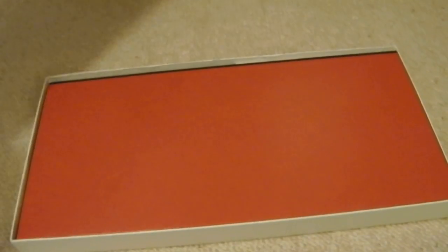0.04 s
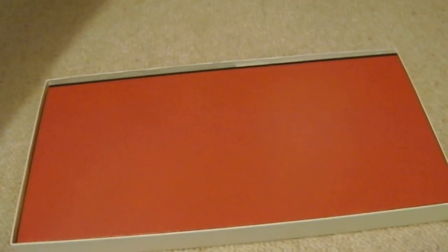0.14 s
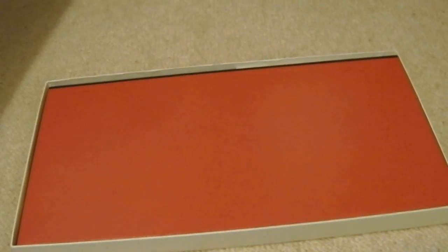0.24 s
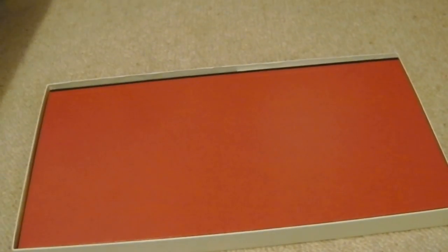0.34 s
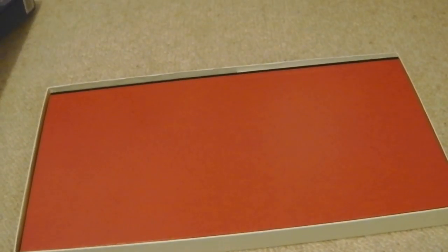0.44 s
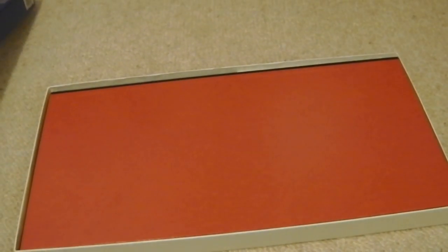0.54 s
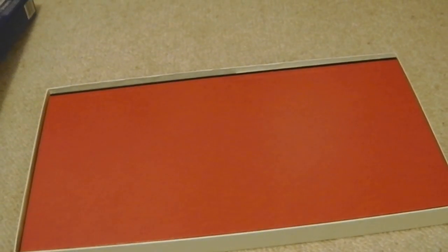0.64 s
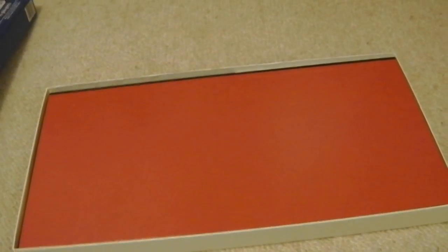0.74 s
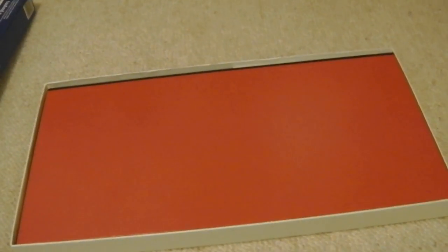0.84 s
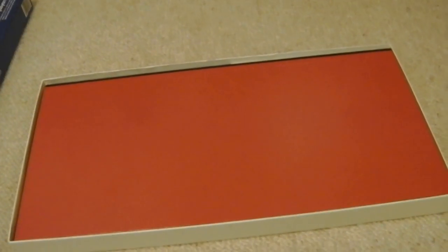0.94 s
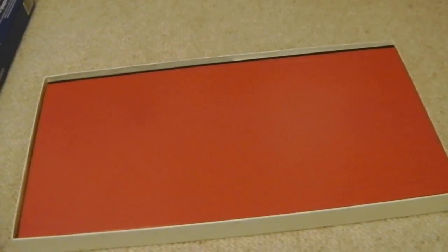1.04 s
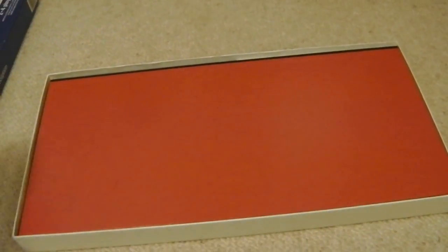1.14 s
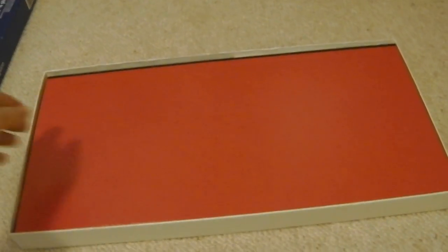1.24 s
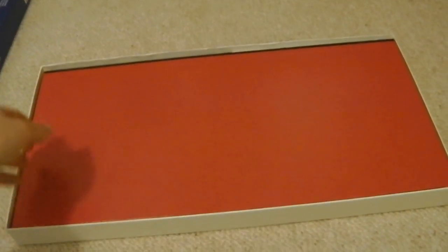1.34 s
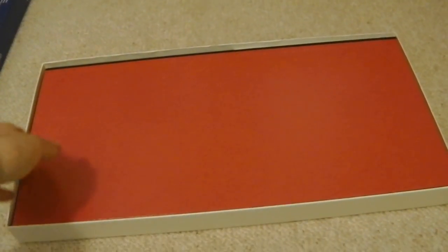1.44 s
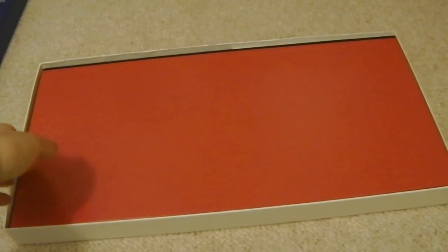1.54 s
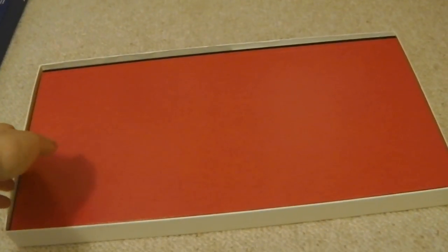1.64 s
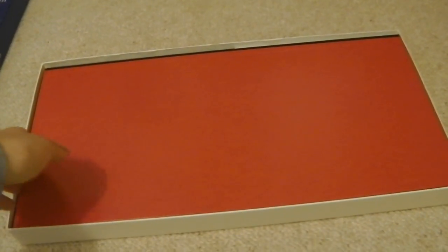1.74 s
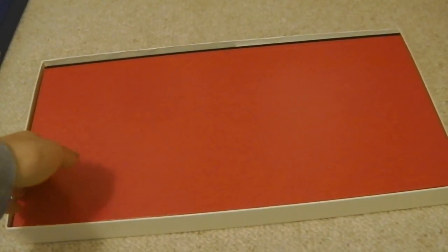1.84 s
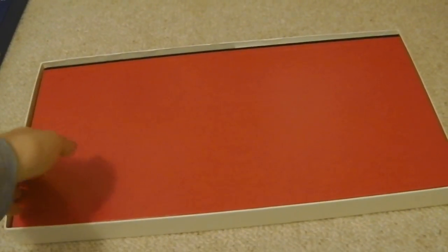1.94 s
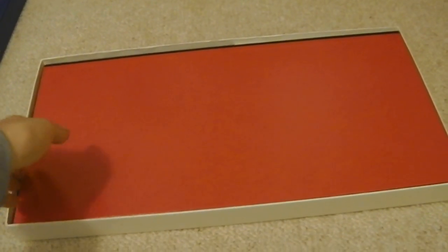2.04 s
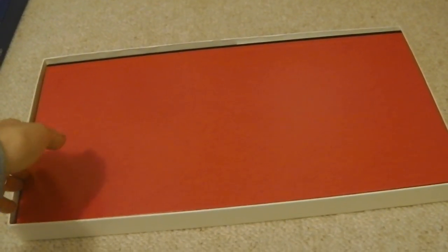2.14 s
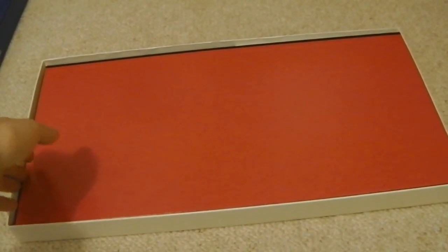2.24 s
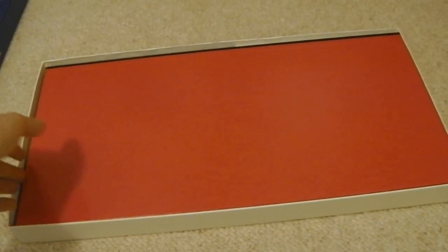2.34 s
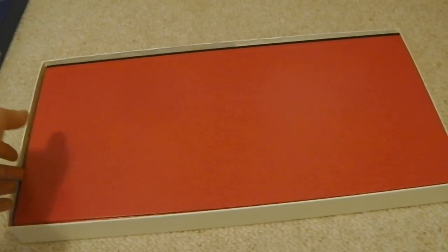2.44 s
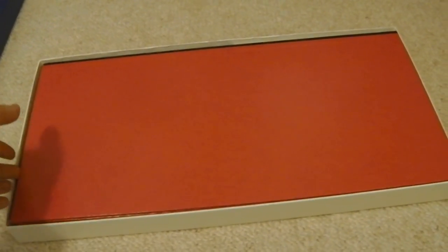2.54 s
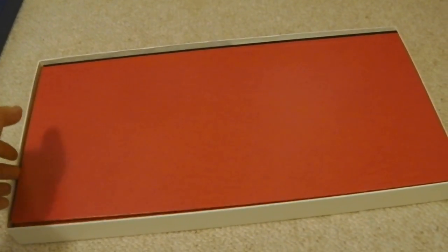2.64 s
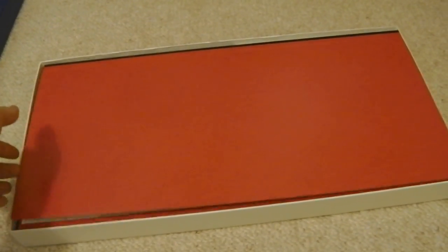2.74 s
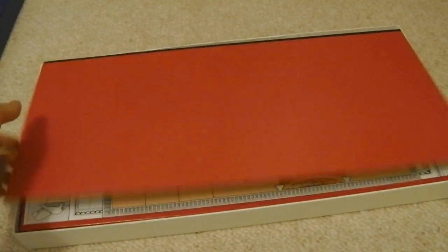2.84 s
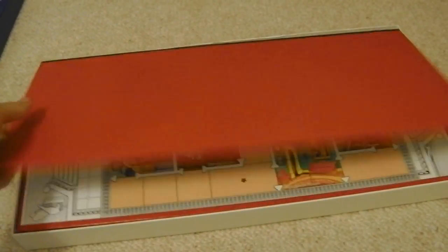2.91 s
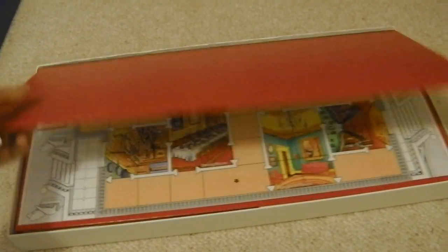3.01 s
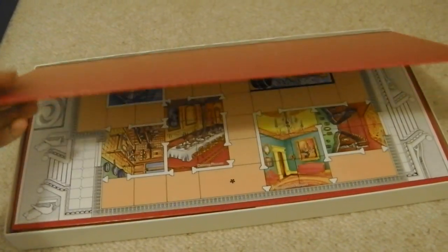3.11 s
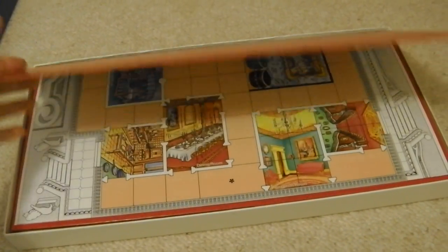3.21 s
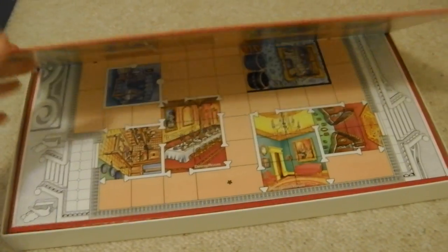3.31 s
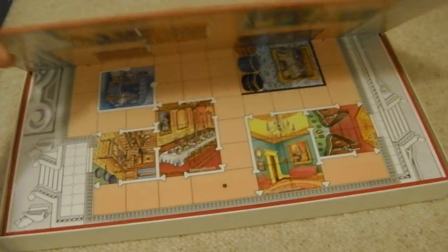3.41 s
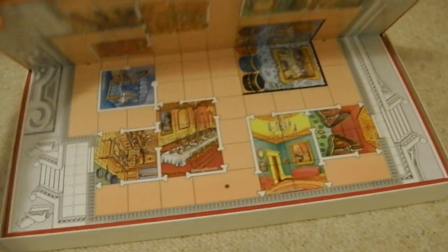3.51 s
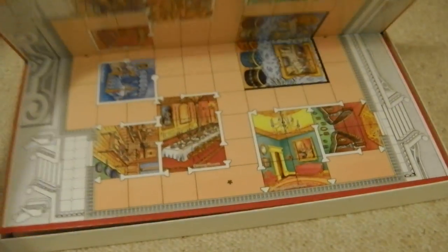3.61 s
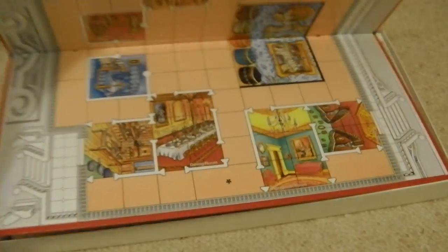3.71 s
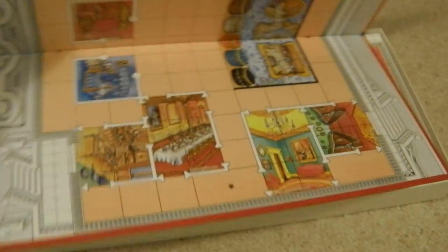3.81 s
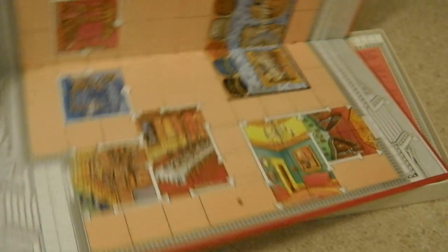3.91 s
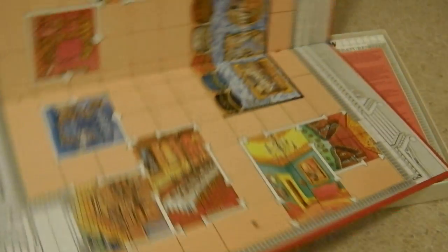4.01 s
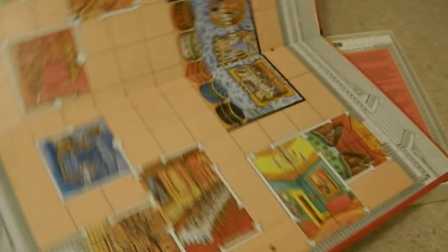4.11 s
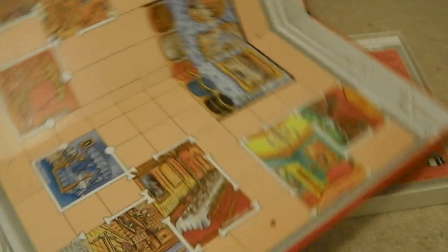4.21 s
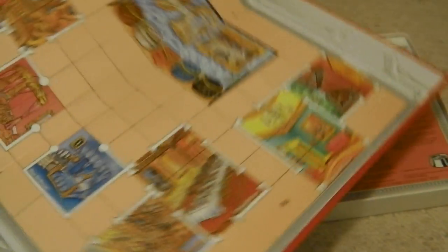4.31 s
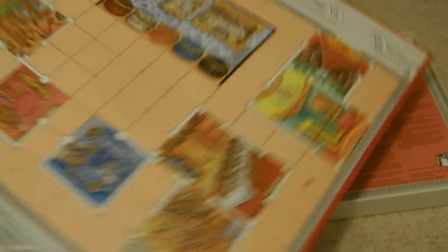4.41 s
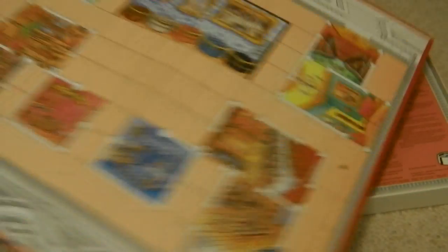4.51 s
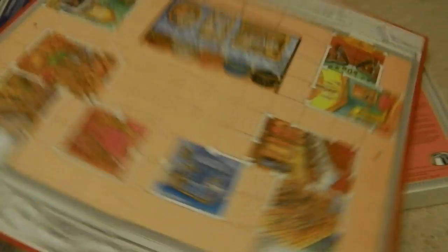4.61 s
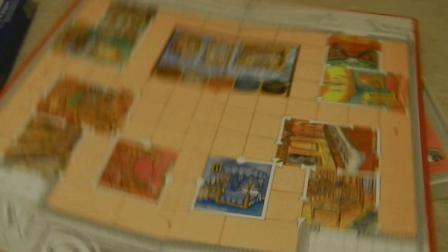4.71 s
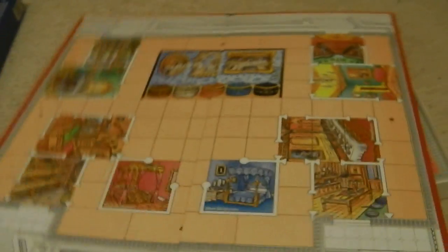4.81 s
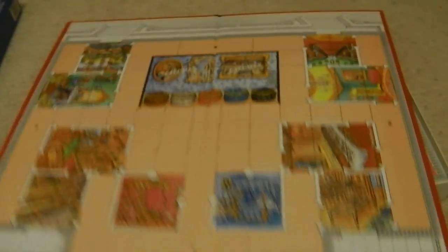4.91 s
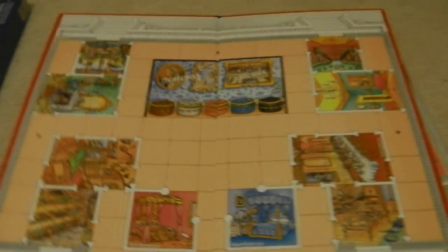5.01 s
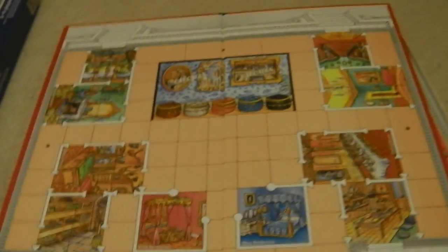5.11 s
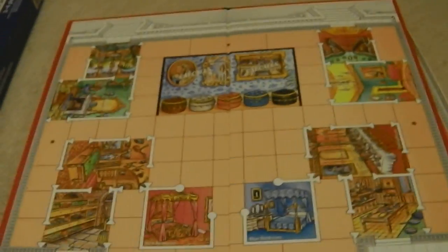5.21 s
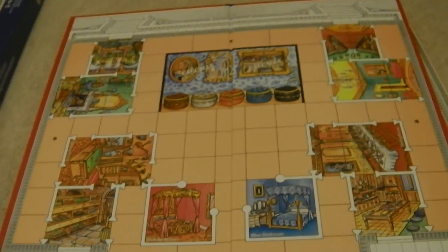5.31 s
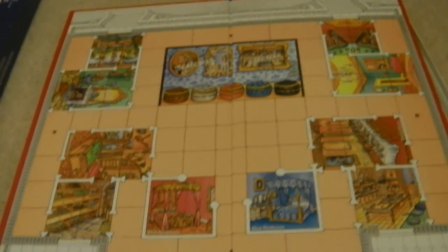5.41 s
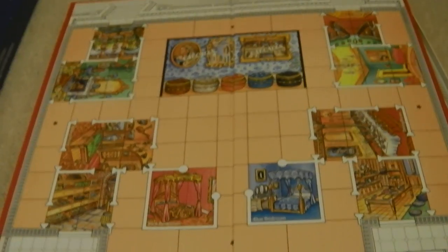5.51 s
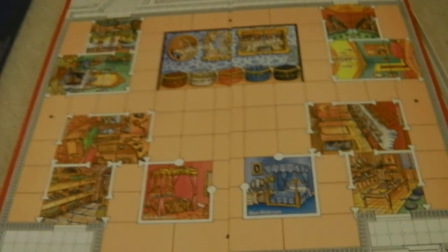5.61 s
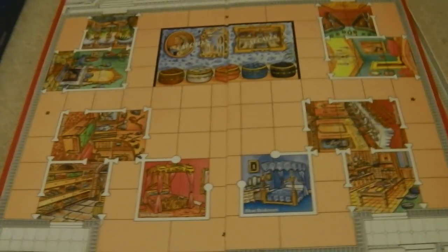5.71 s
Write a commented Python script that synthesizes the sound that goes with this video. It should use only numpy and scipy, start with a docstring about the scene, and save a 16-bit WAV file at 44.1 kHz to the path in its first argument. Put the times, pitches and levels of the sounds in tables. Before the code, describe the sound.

Close indoor handling of a cardboard game board: quiet rustles, a sudden clack, papery rubs, then a tumbling cluster of hollow thumps.

```python
"""First a steady hush, then fingers brushing a cardboard box on a carpet, close to a hand-held camera.
A folded game board is prised out: it flips open, rubs and squeaks along the box wall, then drops on
the rim with hollow knocks and slides to rest. Each knock is a clack, a hollow ring and a thud made of
shaped bursts; rubs are coloured noise under an uneven grip; squeaks are gliding harmonics.
A small room answers, and the microphone's cavity lifts two treble bands."""
import sys
import numpy as np
from scipy import signal
from scipy.fft import rfft, irfft, next_fast_len
from scipy.io import wavfile
from scipy.ndimage import map_coordinates

SR = 44100
rng = np.random.default_rng(int(sys.argv[2]) if len(sys.argv) > 2 else 0)


def wav_out(sig):
    """Save sig, one row per channel (or a flat mono array), as 16-bit PCM at SR to the path in sys.argv[1]."""
    wavfile.write(sys.argv[1], SR, np.round(np.clip(np.atleast_2d(sig).T, -1, 1) * 32767).astype(np.int16))


N = 253575
TIME = np.arange(N) / SR  # whole scene [s]
AGE = TIME[:16384]  # time since a contact [s]


def amp(db):
    """Decibels to gain."""
    return 10 ** (np.asarray(db) / 20)


def unit(x):
    """Scale to rms 1."""
    return x / np.sqrt(np.mean(x ** 2) + 1e-20)


def burst(x):
    """Scale to the energy of a hundredth of a second at rms 1."""
    energy = np.mean(np.sum(x ** 2, -1))
    return x / np.sqrt(energy * 100 / SR)


def along(points, hz):
    """Read (frequency, value) points on a log frequency axis."""
    f, v = np.transpose(points)
    return np.interp(np.log(hz + 1), np.log(f + 1), v)


def decay(t, t60):
    """Falls by 60 dB in t60 seconds."""
    return np.exp(-np.log(1000) * t / t60)


def filtered(x, gain):
    """Causal minimum-phase filter with a given gain at each frequency."""
    n = x.shape[-1]
    m = 2 * next_fast_len(n // 2 + 4096)
    log_gain = np.log(np.maximum(gain(np.fft.rfftfreq(m, 1 / SR)), 1e-6))
    cepstrum = irfft(log_gain)
    cepstrum[1:m // 2] *= 2  # fold the second half onto the first: no sound before its cause
    cepstrum[m // 2 + 1:] = 0
    return irfft(rfft(x, m) * np.exp(rfft(cepstrum)), m)[..., :n]


def coloured(x, spectrum):
    """Pass x through a (frequency [Hz], level [dB]) spectrum."""
    return filtered(x, lambda hz: amp(along(spectrum, hz)))


def peaks(rows, hz):
    """Gain of a set of (frequency [Hz], width [Hz], level [dB]) resonances."""
    return amp(sum(db / (1 + (2 * (hz - centre) / width) ** 2) for centre, width, db in rows))


def stereo(pair, alike):
    """Blend two unrelated signals into left and right with a set likeness at each frequency."""
    n = pair.shape[-1]
    m = next_fast_len(n)
    turn = np.arccos(np.clip(along(alike, np.fft.rfftfreq(m, 1 / SR)), -1, 1)) / 2
    mid, side = irfft(rfft(pair, m) * [np.cos(turn), np.sin(turn)], m)[:, :n]
    return np.array([mid + side, mid - side])


def wobble(rate, t=TIME):
    """A smooth random curve, rate knots a second."""
    knots = rng.standard_normal(int(t[-1] * rate) + 4)
    return map_coordinates(knots, [t * rate])


def add(track, s, sound):
    """Mix a sound into the track at a time."""
    part = track[:, round(s * SR):][:, :sound.shape[-1]]
    part += sound[..., :part.shape[-1]]


def swell(s, width, shape):
    """A passing touch: rises to its middle and falls alike; a lower shape is more pointed."""
    return np.exp(-np.abs((TIME - s) / width) ** shape)


def stroke(s, length, attack, release):
    """A pull: gathers speed, holds, then dies away once its length is over."""
    rise = np.clip((TIME - s) / attack, 0, 1)
    return rise * np.exp(-np.clip((TIME - s - length) / release, 0, 20))


def together(envelopes, dbs):
    """Overlapping rubs at their own levels add in power."""
    return np.sqrt(sum((amp(db) * envelope) ** 2 for envelope, db in zip(envelopes, dbs)))


# left and right of the close sounds, nearly the same in the bass: (frequency [Hz], likeness [-1 to 1])
CLOSE_ALIKE = [(30, 0.8), (120, 0.97), (400, 0.96), (1200, 0.98), (2400, 0.98), (4500, 0.38), (8000, 0.048),
               (15000, -0.18)]


def blow(spectrum, t60, scatter_db, chatter_db=2.0):
    """One push, followed by waves that scatter through the sheet and chatter against the rim."""
    push = burst(coloured(1.0 * (AGE == 0), spectrum))
    chatter = amp(chatter_db * wobble(314, AGE))
    waves = stereo(rng.standard_normal((2, len(AGE))), CLOSE_ALIKE) * chatter * decay(AGE, t60)
    return burst(push + amp(scatter_db) * burst(coloured(waves, spectrum)))


def friction(spectrum, grip, rough_db):
    """Countless fibres catch and let go, in clumps that follow the uneven grip."""
    fibres = stereo(rng.standard_normal((2, N)), CLOSE_ALIKE) * amp(rough_db * grip)
    return unit(coloured(fibres, spectrum))


# cardboard contacts close to the microphone: (time [s], hollow body level [dB], body centre [Hz],
# edge clack level [dB], carpet thud level [dB], rebound relative to the first landing [dB])
KNOCKS = [(2.084, -32, 280, -31.5, -56, -1), (2.477, -55, 446, -41.5, -70, -8),
          (2.652, -52, 447, -47.5, -82, -6), (3.0, -40.5, 500, -54, -67, -7),
          (3.019, -30, 820, -24.5, -60, -9), (3.027, -26.5, 770, -25, -50, -10),
          (3.031, -19, 508, -32.5, -52, -9), (3.342, -54, 440, -51, -74, -4),
          (3.594, -43, 600, -62, -51, -15), (3.806, -50, 368, -42.5, -40, -5),
          (4.573, -20, 443, -28.5, -32, -5), (4.606, -25, 393, -48, -56, -15),
          (4.633, -28.5, 400, -41, -58, -18), (4.684, -28, 370, -49, -50, 4.5),
          (4.753, -13.5, 400, -28.5, -52, -12), (4.768, -20, 473, -23.5, -55, -22),
          (4.798, -12, 468, -26, -51, -6), (4.846, -23, 388, -35.5, -39.5, -2.5),
          (4.884, -36, 385, -56, -51, -15), (4.932, -25.5, 330, -49, -41, -6),
          (4.998, -15, 326, -43, -37, -8), (5.012, -29, 425, -33.5, -40, -14),
          (5.101, -28, 430, -58, -45, -16), (5.125, -22.5, 352, -54, -47.5, 0)]
REBOUND_S, REBOUND_SOFT_DB = 0.0112, -8  # the sheet flexes and lands again, with less clack


def knocks():
    """Every knock is double: the board lands, flexes and lands again with a duller edge."""
    out = np.zeros((2, N))
    for s, body_db, centre_hz, clack_db, thud_db, rebound_db in KNOCKS:
        landing = contact(body_db, centre_hz, clack_db, thud_db)
        add(out, s, landing)
        rebound = contact(body_db, centre_hz, clack_db + REBOUND_SOFT_DB, thud_db)
        add(out, s + REBOUND_S, amp(rebound_db) * rebound)
    return out


# hump of the hollow body: (multiple of its centre frequency, level [dB])
BODY = [(.1, -46.5), (.33, -21.5), (.55, -11), (.78, -5), (1, 0.5), (1.3, -4), (1.75, -10), (2.6, -14.5),
        (4, -26), (8, -42), (20, -56)]
# colour of the edge clack: (frequency [Hz], level [dB])
CLACK = [(200, -0.5), (700, -7.5), (1100, -2), (1600, 0), (2300, 0.5), (3000, -1.5), (3900, -9.5),
         (5500, -16.5), (8000, -13), (11000, -21), (16000, -36)]
# resonances of the stiff rim: (frequency [Hz], width [Hz], level [dB])
EDGE = [(960, 100, 5.5), (1710, 140, 3.5), (2530, 330, 0), (2870, 27, 4), (5100, 640, 7)]
# colour of the carpet thud, also of the grip on the camera: (frequency [Hz], level [dB])
THUD = [(20, -10), (45, -13.5), (80, 6.5), (140, -4), (220, -16.5), (500, -63), (2000, -89)]


def contact(body_db, centre_hz, clack_db, thud_db):
    """A contact clacks at the edge, sounds the hollow box and thuds into the carpet."""
    hump = [(multiple * centre_hz, db) for multiple, db in BODY]  # a stiffer spot sounds higher
    body = burst(blow(hump, t60=0.049, scatter_db=0.5) + amp(-0.5) * ring(hump, spread_db=2.0))
    clack = burst(filtered(blow(CLACK, t60=0.076, scatter_db=11), lambda hz: peaks(EDGE, hz)))
    thud = blow(THUD, t60=0.084, scatter_db=2.5)
    bent = bend(amp(body_db) * body + amp(thud_db) * thud, lag=0.000881)
    return bent + amp(clack_db) * clack


# modes of the board over the hollow box: (frequency [Hz], relative level [dB], 60 dB decay [s])
MODES = [(222.5, -1.5, 0.12), (289.8, -3, 0.18), (359.7, 5.5, 0.12), (377.7, 3, 0.11), (420, -1, 0.054),
         (500, -1.5, 0.08), (582, -3.5, 0.22), (610, -18, 0.08), (726, 5, 0.063), (844, -1, 0.33),
         (926, 4, 0.033), (970, 1, 0.068), (1063, 9.5, 0.047), (1210, -0.5, 0.17)]


def ring(spectrum, spread_db):
    """The board's modes, at new strengths for each point of contact."""
    hz, db, t60 = np.transpose(MODES)[:, :, None]
    level_db = db + along(spectrum, hz) + spread_db * rng.standard_normal(hz.shape)
    strength = amp(level_db) * rng.choice([-1, 1], hz.shape)
    return burst(np.sum(strength * np.sin(2 * np.pi * hz * AGE) * decay(AGE, t60), 0))


def bend(x, lag):
    """Bending waves carry treble fastest: 1 kHz arrives lag seconds late, the bass later still."""
    hz = np.fft.rfftfreq(len(AGE), 1 / SR)
    return irfft(rfft(x) * np.exp(-4j * np.pi * lag * np.sqrt(1000 * hz)), len(AGE))


# the board dragged over the box, one row a pull:
# (start time [s], length [s], relative drone level [dB], relative hiss level [dB])
SLIDES = [(3.012, 0.029, -32, -38.5), (3.067, .02, -50, -43), (3.337, 0.086, -51, -50.5),
          (3.413, .05, -44, -46), (3.529, 0.061, -43, -45), (3.67, 0.15, -50.5, -50.5),
          (3.812, .15, -38, -49.5), (3.988, 0.15, -52.5, -55.5), (4.114, 0.057, -43, -46.5),
          (4.237, 0.25, -46.5, -43.5), (4.294, 0.038, -38, -44), (4.455, 0.021, -39, -42.5),
          (4.503, 0.091, -54, -44.5), (4.575, 0.066, -29.5, -35.5), (4.679, 0.1, -33, -39.5),
          (4.759, 0.085, -25, -44), (4.862, 0.11, -37, -43), (4.987, 0.092, -27.5, -44.5),
          (5.138, 0.056, -40.5, -59)]
# colour of the droning board: (frequency [Hz], level [dB])
DRONE = [(40, -9.5), (150, -8), (260, -11), (370, 2.5), (520, -4), (800, -6.5), (1300, -15), (2200, -15.5),
         (3600, -24), (5800, -20.5), (8000, -25.5), (13000, -59)]
# colour of the rubbing hiss, shared with the fingers: (frequency [Hz], level [dB])
HISS = [(800, -60), (2500, -12), (4000, -3), (5500, -3.5), (7300, -1.5), (8800, -3), (10500, -5),
        (13000, 0), (16000, -6)]


def slide():
    """The dragged edge hisses and makes the whole board drone."""
    starts, lengths, drone_db, hiss_db = np.transpose(SLIDES)
    pulls = [stroke(s, length, attack=0.013, release=0.022) for s, length in zip(starts, lengths)]
    grip = wobble(300)
    drone = amp(-4.5) * together(pulls, drone_db) * friction(DRONE, grip, rough_db=1)
    hiss = amp(-1.5) * together(pulls, hiss_db) * friction(HISS, grip, rough_db=2.0)
    return drone + hiss


# short hard scrapes of edge on edge: (time [s], width [s], level [dB])
SCUFFS = [(2.084, 0.0013, -27), (4.5905, 0.0036, -24), (4.612, 0.023, -40), (4.637, 0.006, -35),
          (4.697, 0.021, -38), (4.768, 0.0052, -28), (4.802, .004, -41), (4.863, 0.0066, -37),
          (5.017, 0.028, -34.5), (5.082, 0.013, -35), (5.14, 0.0048, -43.5)]
# colour of a scrape: (frequency [Hz], level [dB])
SCUFF = [(300, 4), (900, -11), (1700, 7.5), (2700, -6), (4000, -2), (5600, 4), (7500, -6.5), (10000, -6),
         (16000, -15)]


def scuffs():
    """An edge skids for an instant: a gritty swell of friction."""
    skids = sum(amp(db) * swell(s, width, shape=2) for s, width, db in SCUFFS)
    return skids * friction(SCUFF, wobble(900), rough_db=2)


# the edge sticking and slipping on the box wall:
# (start time [s], length [s], first slip rate [Hz], last slip rate [Hz], level [dB])
SQUEAKS = [(3.54, 0.025, 960, 810, -49), (3.585, 0.018, 1900, 1730, -47), (3.854, 0.0655, 370, 430, -42.5),
           (3.924, 0.028, 490, 505, -33.5)]
# harmonics of the squeak: (multiple of the slip rate, relative level [dB])
SQUEAK_TONE = [(1, 4.5), (2, -11.5), (3, -14), (4, -11)]


def squeaks(jitter):
    """Slips lock into a gliding tone where the edge presses on the wall."""
    out = np.zeros(N)
    for s, length, first_hz, last_hz, db in SQUEAKS:
        rate = np.interp(TIME, [s, s + length], [first_hz, last_hz])
        phase = 2 * np.pi * np.cumsum(rate * (1 + jitter * wobble(300))) / SR
        tone = sum(amp(level) * np.sin(k * phase) for k, level in SQUEAK_TONE)
        uneven = unit(tone * amp(0.72 * wobble(110)))
        out += amp(db) * stroke(s, length, attack=0.01, release=0.0092) * uneven
    return out


# the printed faces brushing past each other as the fold opens: (start time [s], length [s], level [dB])
PEELS = [(2.922, 0.11, -39), (3.127, 0.033, -44.5), (3.235, 0.085, -47)]
# colour of paper on paper: (frequency [Hz], level [dB])
PEEL = [(800, -32), (2500, -9), (4000, -8.5), (6500, -3), (8800, -1.5), (10500, -3.5), (13000, 4),
        (16000, -1)]


def peel():
    """Smooth paper on paper: a thin, high hiss with no body."""
    speed = sum(amp(db) * stroke(s, length, attack=0.016, release=0.023) for s, length, db in PEELS)
    return speed * friction(PEEL, wobble(320), rough_db=0.0)


# sharp little snaps: (time [s], relative level [dB])
TICKS = [(1.1545, -42), (1.1668, -27), (2.083, -32)]
# colour of a snap: (frequency [Hz], level [dB])
SNAP = [(200, -25), (1000, -5), (2500, 0.5), (4500, 6.5), (7000, 4.5), (10000, -9.5), (16000, -12)]


def ticks():
    """Dry snaps too small to sound the box."""
    out = np.zeros((2, N))
    for s, db in TICKS:
        add(out, s, amp(db - 10.5) * blow(SNAP, t60=.012, scatter_db=-7))
    return out


# sleeve and fingertips brushing:
# (middle time [s], width [s], relative rustle level [dB], relative hiss level [dB])
FINGERS = [(.424, 0.017, -51.5, -45), (.47, 0.031, -52.5, -53), (.55, 0.023, -47, -46),
           (0.584, .022, -58, -43.5), (0.666, 0.061, -46, -47), (.79, .06, -51.5, -53),
           (.9, 0.027, -54, -52), (1.32, 0.066, -74, -51.5), (1.503, 0.014, -51, -58),
           (1.57, 0.041, -58, -54), (1.775, 0.014, -46.5, -37.5), (1.9, .015, -51.5, -49),
           (1.98, 0.072, -61.5, -53), (2.06, 0.017, -46, -67), (2.281, 0.022, -47.5, -42.5),
           (2.505, 0.041, -50, -48), (2.592, .018, -46.5, -42.5), (2.79, 0.2, -54, -47.5)]
# colour of the sleeve: (frequency [Hz], level [dB])
RUSTLE = [(100, -18), (250, -9), (380, 7.5), (650, -4), (1100, -1), (1500, -4.5), (2050, 2), (3200, -18),
          (6000, -11), (16000, -34)]


def fingers():
    """Cloth and skin brush softly over the box in short uneven catches."""
    middles, widths, rustle_db, hiss_db = np.transpose(FINGERS)
    touches = [swell(s, width, shape=1.44) for s, width in zip(middles, widths)]
    grip = wobble(350) + 0.9 * wobble(44.87)
    rustle = amp(-1) * together(touches, rustle_db) * friction(RUSTLE, grip, rough_db=2.0)
    hiss = amp(-3.5) * together(touches, hiss_db) * friction(HISS, grip, rough_db=1.5)
    return rustle + hiss


# grip on the camera, right at the microphone: (time [s], level [dB])
BUMPS = [(.42, -48), (.98, -43.5), (1.012, -41), (1.033, -47), (2.335, -49.5), (4.158, -40.5), (4.194, -47)]


def bumps():
    """The hand shifts on the camera body: low thuds without the room."""
    out = np.zeros((2, N))
    for s, db in BUMPS:
        add(out, s, amp(db) * blow(THUD, t60=0.22, scatter_db=-1))
    return out


# small carpeted room: (frequency [Hz], 60 dB decay [s])
ROOM = [(100, 0.35), (400, 0.24), (1500, 0.26), (4000, 0.25), (12000, 0.2)]


def room(x, delay):
    """The room's answer: scattered echoes in a short tail whose treble dies first."""
    noise = stereo(rng.standard_normal((2, SR // 2)), CLOSE_ALIKE)
    hz, t, z = signal.stft(noise, SR, nperseg=256)
    tail = signal.istft(z * decay(t, along(ROOM, hz)[:, None]), SR, nperseg=256)[1]
    tail = tail * np.clip(TIME[:tail.shape[1]] / delay - 1, 0, 1)  # silent for delay, then fades in
    return signal.fftconvolve(x, tail / np.linalg.norm(tail[0]), axes=1)[:, :N]


# colour of the background: (frequency [Hz], level [dB])
FLOOR = [(20, 0), (60, 5), (140, 4.5), (190, -0.5), (290, -1), (370, 11), (490, 6.5), (620, 2.5),
         (1100, -0.5), (2000, 0.5), (3500, -2), (8000, -3), (12000, -4.5), (16000, -6.5)]
# left and right of the background: (frequency [Hz], likeness [-1 to 1])
FLOOR_ALIKE = [(60, -0.18), (240, -0.3), (950, -0.41), (3770, -0.42), (15000, -0.26)]


def hush():
    """Steady wide background: coloured noise, left and right leaning opposite ways."""
    return unit(coloured(stereo(rng.standard_normal((2, N)), FLOOR_ALIKE), FLOOR))


# microphone cavity resonances: (frequency [Hz], width [Hz], level [dB])
PORTS = [(8465, 1010, 10.5), (11880, 730, 8)]
# stereo place of the box: (frequency [Hz], left minus right [dB])
LEFT = [(60, 2), (200, 2.5), (380, 4), (700, 2), (1300, 1), (4400, -0.5), (9000, 0), (15000, 0.5)]


def scene():
    """The box a little to the left, its room, the hand on the camera and the background hush."""
    box = knocks() + ticks() + scuffs() + fingers() + slide() + peel() + squeaks(jitter=0.0117)
    air = box + amp(-12) * room(box, delay=0.0047)
    heard = filtered(air, lambda hz: peaks(PORTS, hz))
    placed = [filtered(ear, lambda hz: amp(side * along(LEFT, hz) / 2)) for ear, side in zip(heard, (1, -1))]
    return np.array(placed) + bumps() + amp(-48.0) * hush()


NOTCH_HZ, TOP_HZ = 7900, 15850


def record(dry):
    """The camera cuts one narrow treble notch and keeps nothing above its band limit."""
    notched = signal.lfilter(*signal.iirnotch(NOTCH_HZ, 18, SR), dry)
    m = next_fast_len(N + SR // 2)
    kept = np.fft.rfftfreq(m, 1 / SR) < TOP_HZ
    return irfft(rfft(notched, m) * kept, m)[:, :N]


dry = scene()
out = record(dry)
wav_out(out)
```